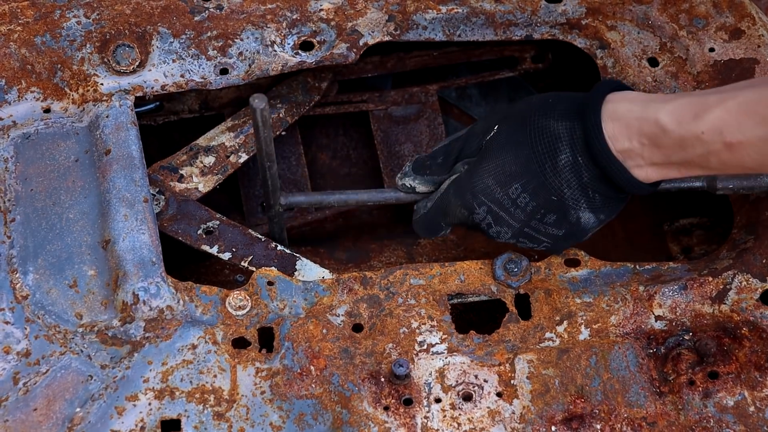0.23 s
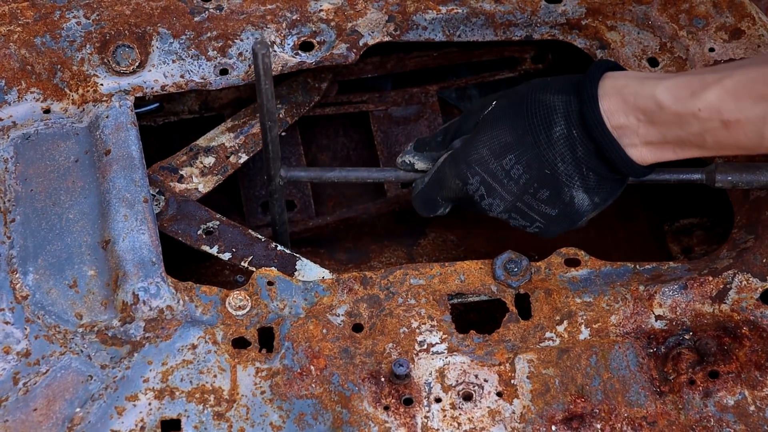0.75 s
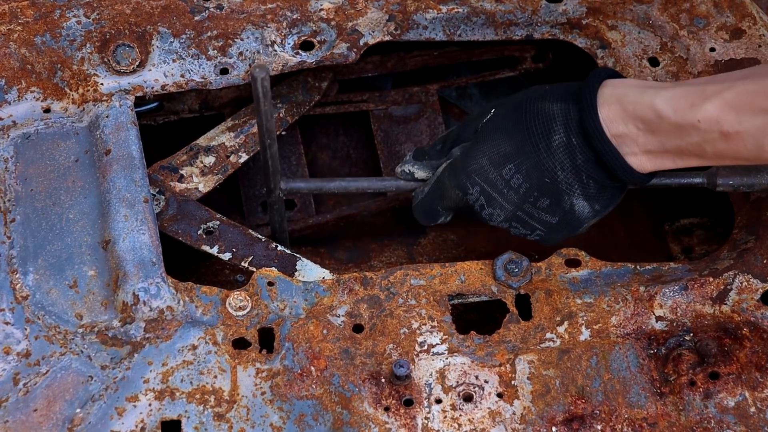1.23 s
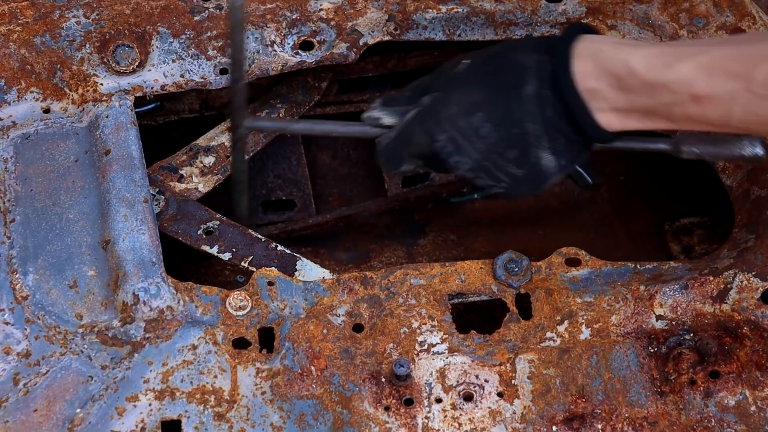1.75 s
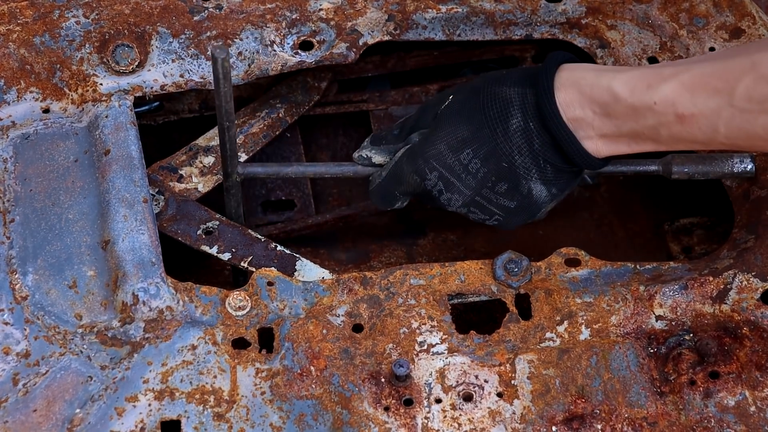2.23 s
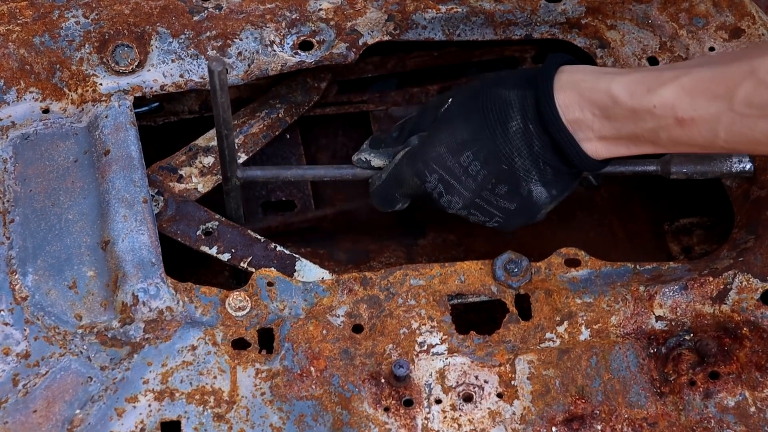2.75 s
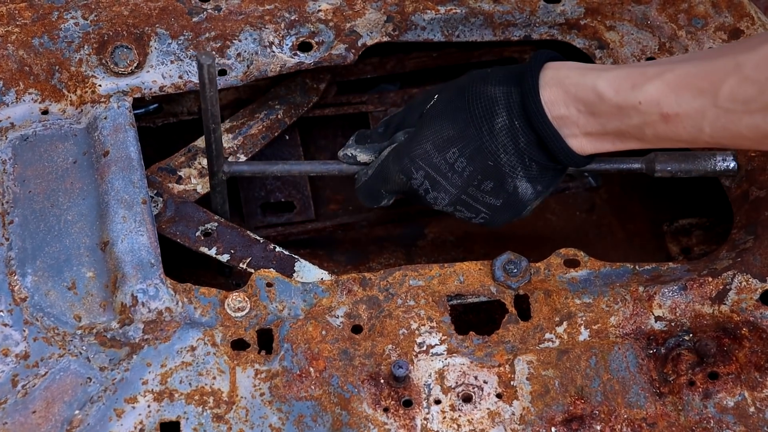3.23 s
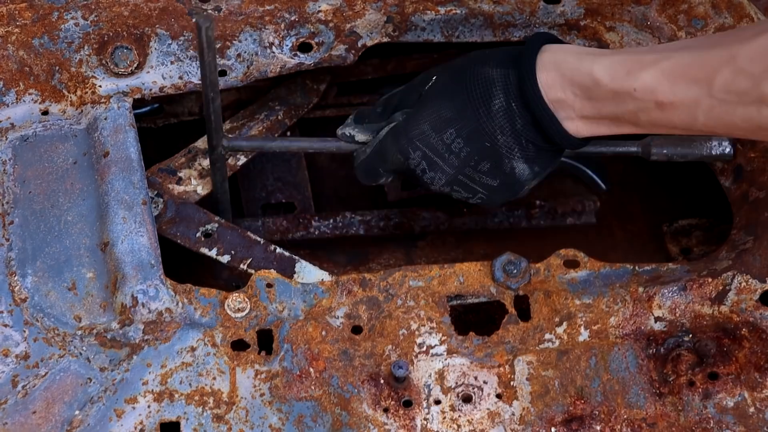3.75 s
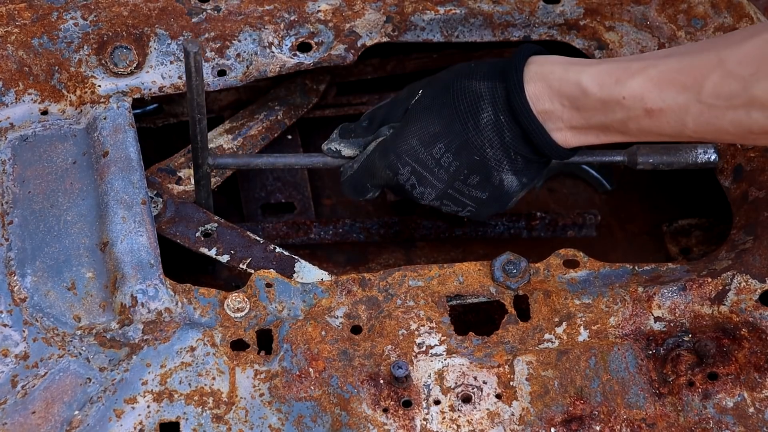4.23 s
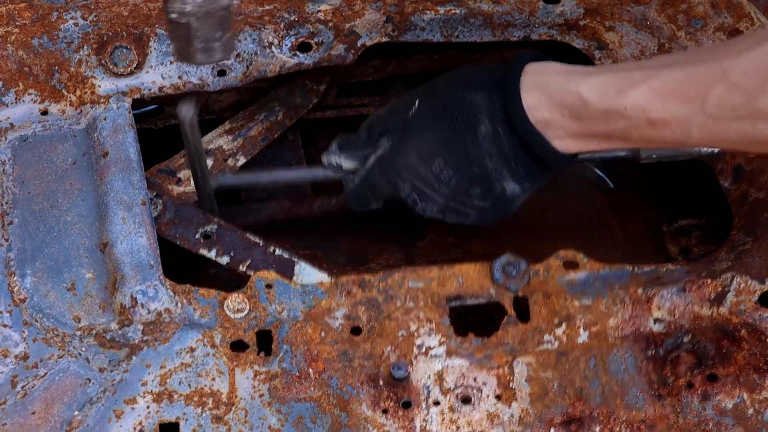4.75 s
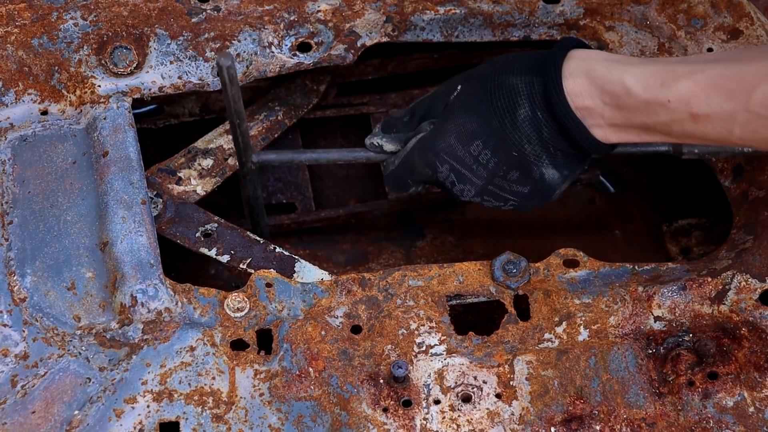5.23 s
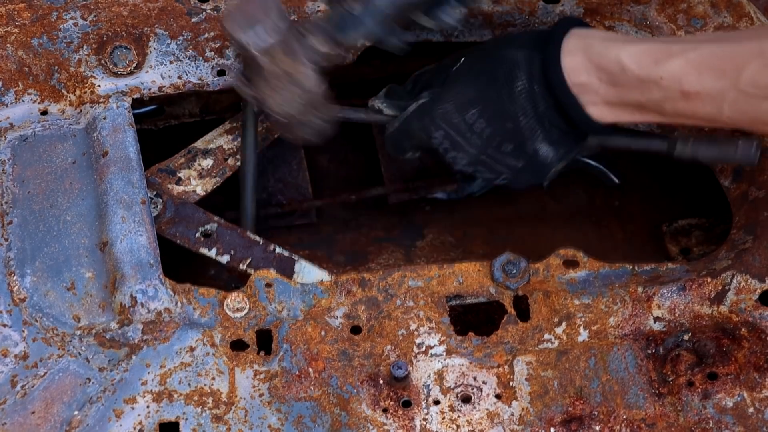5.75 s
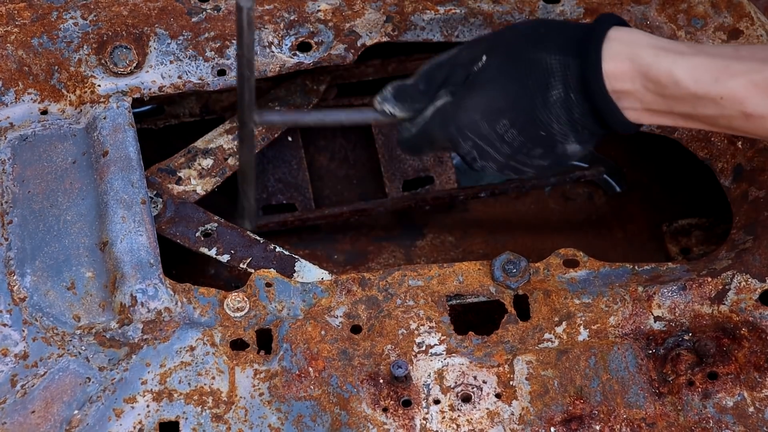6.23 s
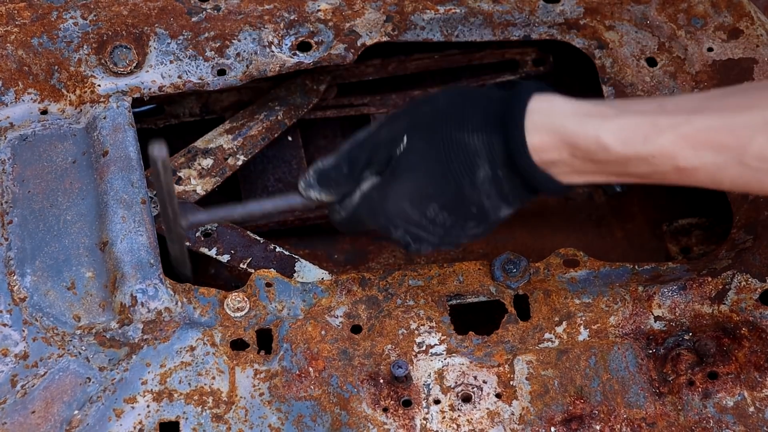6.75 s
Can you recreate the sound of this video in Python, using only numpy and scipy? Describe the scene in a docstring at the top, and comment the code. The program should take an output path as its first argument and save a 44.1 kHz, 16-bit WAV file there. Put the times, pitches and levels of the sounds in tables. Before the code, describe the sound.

Slow, hard hammer blows on a steel bar against rusty sheet metal, each clanging and rattling briefly, with softer clunks and falling flakes between.

```python
"""Hammering a steel bar on rusty sheet steel

A hand hammer drives a steel bar against a rusted frame in a workshop, close to a two-port microphone.
Blows start damped modes (cracks, panel boom) and ringing noise bands (sheet); strips and scale rattle on.
Between blows the bar is set down and scrapes, shaped noise, and rust flakes fall as short noise patters.
Hum from sines and rumble from wandering noise lie underneath; the loudest peaks overload the input."""
import sys
import numpy as np
from scipy import signal
from scipy.fft import rfft, irfft, next_fast_len
from scipy.io import wavfile
from scipy.ndimage import uniform_filter1d

SR = 44100
rng = np.random.default_rng(int(sys.argv[2]) if len(sys.argv) > 2 else 0)


def decibels_to_gain(level_db):
    """Convert a level in decibels to a linear amplitude gain (20 dB per decade)."""
    exponent = np.asarray(level_db, float) / 20
    return 10 ** exponent


def wrap_up_sound(samples):
    """Save the sound to the file named by the first command line argument, as 16-bit audio."""
    columns = np.atleast_2d(samples).T
    # keep every value between -1 and 1, then stretch to whole-number steps
    tamed = np.clip(columns, -1, 1)
    steps = np.round(tamed * 32767).astype(np.int16)
    wavfile.write(sys.argv[1], SR, steps)


N = 308259
T = np.arange(N) / SR  # time in s
BANDS_HZ = 22 * 2 ** np.arange(0, 9.6, 1 / 3)  # third-octave band centres

# Levels in the tables are relative, unless called rms: each source adds its own gain.
# Blows and knocks; boom and treble are relative to the blow's level.
# Columns: start_s, level_db, boom_db, treble_db, rise_ms
BLOWS = [(0.1347, -23.5, 0.5, -29, 3.3), (0.2137, -13, -10, -16, 2.1), (0.229, -11.5, -9, -23, 4),
         (0.865, -33, -11, -14, 2.9), (1.5176, 6, -15.5, -6.5, 0.19), (2.0492, -10.5, 0.5, -16.5, 2.5),
         (2.2622, -21, -17.5, -16.5, 1.9), (2.6556, 4, -14.5, -5, 0.27), (3.1094, -4.5, -4, -21.5, 1.9),
         (3.7658, 3, -13.5, -3.5, 0.22), (4.2736, -8.5, -4.5, -48, 1.6), (4.8201, 2.5, -11.5, -5, 0.17),
         (5.2926, -19.5, 0.5, -11, 4.8), (5.7129, -29, -20, -5, 1.6), (5.8271, 5, -22.5, -5, 0.48),
         (6.2841, -20.5, -23, -12, 1.4), (6.3008, -27, -12.5, -26, 3), (6.5779, -10.5, -13.5, -7, 1.09),
         (6.589, -3, -21, -0.5, 3.9)]
# Spells of rattling strips and rust scale.
# Columns: start_s, level_db, hold_s, boom_db, treble_db
RATTLES = [(0.0, -28.5, 0.011, 2.5, -3.5), (0.14, -38, 0.018, 7, -9.5), (0.218, -23, 0.018, 0, -7.5),
           (0.568, -51.5, 0.085, 9.5, -16), (0.861, -48.5, 0.04, 3, -5), (1.079, -49, 0.012, 5, -16),
           (1.524, -16.5, 0.11, -5.5, -2.5), (1.653, -19, 0.069, -3.5, -1.5), (1.943, -44.5, 0.12, 4, -15),
           (2.046, -24.5, 0.022, 6.5, -3.5), (2.258, -36.5, 0.012, 3.5, -17),
           (2.654, -16, 0.049, -2.5, 1.5), (2.742, -18, 0.029, 0.5, 0), (2.815, -18.5, 0.054, -1.5, -3),
           (2.966, -33.5, 0.072, -1, 1.5), (3.118, -22, 0.01, 4.5, -6), (3.768, -17.5, 0.07, -5, 1.5),
           (3.857, -18, 0.15, -2.5, 0), (4.166, -38, 0.081, 5.5, -5), (4.279, -26, 0.009, 4, -11.5),
           (4.225, -43.5, 0.02, 3, -10), (4.383, -39.5, 0.014, 1.5, -26), (4.819, -18.5, 0.12, 0, -0.5),
           (4.949, -16.5, 0.049, -4, 0), (5.039, -26.5, 0.038, -7, 3.5), (5.133, -33, 0.022, -0.5, -8),
           (5.296, -28.5, 0.019, 2.5, -7), (5.714, -46.5, 0.02, 1, -4), (5.828, -18, 0.07, -4, -0.5),
           (5.9, -18.5, 0.12, -4, -1), (6.283, -29.5, 0.012, -6, -11.5), (6.477, -50, 0.02, -14.5, -18),
           (6.576, -20, 0.049, -4.5, -2.5), (6.758, -38, 0.024, -6, -1), (6.94, -54.5, 0.04, 0, -15)]
# Falling flakes of rust.
# Columns: start_s, level_db, tilt_db_per_octave
FLAKE_FALLS = [(0.5574, -51, -1), (0.6166, -53, -1), (0.8924, -40.5, 0.5), (1.0894, -51, -4.5),
               (1.2794, -56, -1.1), (1.845, -39, -3.5), (2.0174, -50, -1.7), (2.115, -38, 4),
               (2.4388, -49.5, -1.5), (2.905, -19, -2.5), (3.007, -30, -2), (3.3594, -61, -3),
               (3.4294, -55, -1.1), (3.442, -51.5, -3), (3.669, -47, -0.7), (3.7304, -51.5, -0.5),
               (4.4713, -41.5, -6), (6.1406, -31.5, -4)]
# The bar dragged over rust; swell and fade are the times for 20 dB of change.
# Columns: loudest_s, level_db, swell_s, fade_s
DRAGS = [(0.733, -31, 0.09, 0.1), (6.795, -43, 0.029, 0.064)]
# Colour of the scraping noise.
# Columns: pitch_hz, level_db (per Hz)
DRAG_COLOUR = [(530, -59), (900, -27), (1010, -20), (1790, -12.5), (2530, -2), (3960, -11), (4920, -15),
               (6710, -14), (11300, -20), (14000, -69.5)]
# Single modes of bar and strips that sing out or squeak; t60 is the time to fall 60 dB.
# Columns: start_s, pitch_hz, level_db, t60_s, rise_ms
SINGING_MODES = [(2.657, 6600, -36, .15, 2), (3.86, 8290, -45, .9, 30), (4.0, 8290, -41, .45, 10),
                 (5.575, 1798, -54.5, .5, 40), (5.61, 2361, -61, .4, 20), (5.98, 7808, -51, .7, 10),
                 (5.98, 6901, -48, .6, 10), (6.785, 2371, -35, .17, 12), (6.762, 3004, -37, .15, 12)]
# Modes of a loose strut that is knocked once.
# Columns: pitch_hz, level_db, t60_s
STRUT_MODES = [(549, -31, .35), (1079, -47, .3), (1515, -43, .4), (2234, -40, .3), (3150, -56, 1.0),
               (3850, -45, .25), (5774, -57, .8)]
# Lowest panel modes; the t60 is shortened where it is used.
# Columns: pitch_hz, level_db, t60_s
PANEL_MODES = [(250, -22.5, 1.3), (322.5, -0.5, 0.44), (370.5, -8.5, 1), (564, -9, 0.35), (604, -11, 0.3),
               (651, -12, 0.61)]
# Colour of the dense sheet modes.
# Columns: pitch_hz, level_db (per Hz)
STEEL_COLOUR = [(35, -69), (60, -37.5), (150, -9.5), (236, -7.5), (305, 3.5), (350, -4), (533, -0.5),
                (1050, -6), (1400, -8), (2590, -7), (4500, -15), (10700, -23), (13500, -30), (15500, -79.5)]
# Relative ring time of the sheet, shortened where it is used.
# Columns: pitch_hz, t60_s
STEEL_T60 = [(80, .5), (300, 0.28), (1000, 0.15), (3000, 0.15), (8000, 0.089), (14000, 0.065)]
# How the two microphone ports compare; likeness is changed at low pitch where it is used.
# Columns: pitch_hz, likeness (0 to 1), left_lead_rad, left_minus_right_db
PORT_PAIR = [(40, 1, 1.5, 1), (130, 1, 0., -0.7), (407, 0.98, -0.5, 0.5), (786, 0.79, 0.49, 0),
             (1520, 0.11, 0.87, 0), (2490, 0.42, 2.5, -3), (4800, 0.8, 2, 1.5), (8800, 0.55, 2.5, -1),
             (14000, 0.6, 4, -1)]
# Level of the mid background noise, which rises and dips over time.
# Columns: time_s, level_db
MID_NOISE_LEVEL = [(0, -44.5), (.7, -53), (1.0, -49.5), (1.45, -46.5), (1.8, -49), (3.0, -50), (3.7, -49.5),
                   (4.1, -55), (4.75, -47), (5.1, -50.5), (5.75, -59), (6.3, -51), (6.99, -51)]
# Colour of the background noise.
# Columns: pitch_hz, level_db (per Hz)
AIR_COLOUR = [(20, -15.5), (64, -4.5), (110, -7.5), (200, -13), (360, -16), (480, -18), (725, -16),
              (1100, -22), (1600, -20), (2300, -24.5), (3300, -29), (6000, -34.5), (11500, -49),
              (15500, -68.5)]
# Mains hum.
# Columns: pitch_hz, level_db (rms)
HUM_TONES = [(60, -62), (180, -63.5)]


def on_hz(table, hz):
    """Reads the columns of a table at given pitches, on a log-frequency axis."""
    table_hz, *columns = np.transpose(table)
    return [np.interp(np.log(hz), np.log(table_hz), column) for column in columns]


def band_noises(mode_db, mode_width_hz, diffuse):
    """Third-octave noises, lumpy like close modes, with likeness and phase between ports from the table."""
    size = next_fast_len(N)
    hz = np.maximum(np.arange(size // 2 + 1) * SR / size, 1)
    like, lead_rad, lean_db = on_hz(PORT_PAIR, hz)
    # far sources come from all sides, which changes the likeness of the low notes
    like = np.clip(like, 0, 1) ** np.interp(np.log(hz), np.log([300, 1500]), [diffuse, 1])
    width = int(mode_width_hz * size / SR)
    lumps_db = mode_db * np.sqrt(width) * uniform_filter1d(rng.standard_normal(len(hz)), width)
    lumps = decibels_to_gain(lumps_db)
    shared, separate = rfft(rng.standard_normal((2, size))) * lumps / np.sqrt(np.mean(lumps ** 2))
    left = shared * decibels_to_gain(lean_db / 2)
    right = like * shared * np.exp(-1j * lead_rad) + np.sqrt(1 - like ** 2) * separate
    pair = np.array([left, right * decibels_to_gain(-lean_db / 2)])
    noises = []
    for centre in BANDS_HZ:
        shape = np.cos(np.pi / 2 * np.clip(3 * np.log2(hz / centre), -1, 1))
        noises.append(irfft(pair * shape, size)[:, :N])
    return noises


def walk(rate):
    """A wandering level: random values held for 1 / rate s and smoothed twice."""
    hold = int(SR / rate)
    steps = np.repeat(rng.standard_normal(N // hold + 1), hold)
    return 1.3 * uniform_filter1d(uniform_filter1d(steps, hold), hold)[:N]


def fade(power, t60):
    """Energy put in dies away by 60 dB in t60 s (at least 3 ms); steady input keeps its level."""
    pole = np.exp(-2 * np.log(1000) / (max(t60, .003) * SR))
    return signal.lfilter([1 - pole], [1, -pole], power)


def grains(rate, spread_db):
    """Power of many small contacts, a few much larger than the rest, with a mean of 1."""
    sizes = decibels_to_gain(2 * spread_db * rng.exponential(1, N).clip(0, 4))
    power = (rng.random(N) < rate / SR) * sizes
    return power / power.mean()


def ring(drive, hz, t60):
    """One damped mode: a resonance that falls 60 dB in t60 s."""
    pole = np.exp(2j * np.pi * hz / SR - np.log(1000) / (t60 * SR))
    return signal.lfilter([1], [1, -pole], drive).imag


def tone(hz, boom_db, treble_db):
    """Colour change in dB: boom lifts the panel band near 310 Hz, treble tilts all above 1.8 kHz."""
    boom = boom_db * np.exp(-(np.log2(hz / 310) / 0.63) ** 2 / 2)
    return boom + treble_db * np.clip(np.log2(hz / 1800) / 1.99, 0, 1.3)


def rattling():
    """Level, boom and treble of all rattles together: quick attack, hold, then a straight fall in dB."""
    attack_s, fall_db_per_s = 0.002, 134.5
    dulling_db, booming_db, settle_db = -8.5, 2, 10.5  # a dying rattle loses treble and gains boom
    power, boom, treble = np.full((3, N), 1e-12)
    for start_s, level_db, hold_s, boom_db, treble_db in RATTLES:
        near_blows = [blow[0] for blow in BLOWS if abs(blow[0] - start_s) < .03]
        begin_s = max([start_s] + near_blows[:1])  # never ahead of its blow
        hold_s = hold_s - (begin_s - start_s)
        i = int(max(begin_s, 0) * SR)
        t = T[:min(SR // 2, N - i)]
        fall_db = fall_db_per_s * np.maximum(t - hold_s, 0)
        settled = 1 - np.exp(-fall_db / settle_db)
        spell = np.minimum(t / attack_s, 1) ** 2 * decibels_to_gain(2 * (level_db - fall_db))
        power[i:i + len(t)] += spell
        # colours are averaged by the power of each spell
        boom[i:i + len(t)] += spell * (boom_db + booming_db * settled)
        treble[i:i + len(t)] += spell * (treble_db + dulling_db * settled)
    return 10 * np.log10(power), boom / power, treble / power


def room(noises):
    """The rumble wanders slowly, the mid noise rises and dips, the hiss is steadier; mains hum is added."""
    rumble_db = -55 + 2 * walk(1.5)
    mid_db = np.interp(T, *np.transpose(MID_NOISE_LEVEL))
    hiss_db, hiss_from_hz = -52, 3200
    out = sum(decibels_to_gain(db) * np.sqrt(2) * np.sin(2 * np.pi * hz * T) for hz, db in HUM_TONES)
    for hz, noise, db in zip(BANDS_HZ, noises, *on_hz(AIR_COLOUR, BANDS_HZ)):
        upper_share = np.clip(np.log2(hz / 90) / 1.1, 0, 1)
        hiss_share = np.clip(np.log2(hz / hiss_from_hz), 0, 1)
        upper_db = (1 - hiss_share) * mid_db + hiss_share * hiss_db
        level_db = (1 - upper_share) * rumble_db + upper_share * upper_db
        out = out + decibels_to_gain(db + 26.5 + level_db + 1.3 * walk(13.0)) * noise  # each band flickers a little
    return out


def scrape(noises):
    """Steel catching on rust grains; each drag swells and fades smoothly."""
    grit = fade(grains(rate=2600.0, spread_db=0.2), 0.014)
    hiss = sum(decibels_to_gain(db) * noise for db, noise in zip(*on_hz(DRAG_COLOUR, BANDS_HZ), noises))
    drag = 0
    for loudest_s, level_db, swell_s, fade_s in DRAGS:
        change_s = np.where(T < loudest_s, swell_s, fade_s)
        drag = drag + decibels_to_gain(level_db - 20 * ((T - loudest_s) / change_s) ** 2)
    return decibels_to_gain(11.5) * drag * np.sqrt(grit) * hiss


def flakes(noises):
    """Each falling flake is a short, fast-fading patter of the noise bands centred above 1.5 kHz."""
    t60_s = 0.14
    out = np.zeros((2, N))
    for start_s, level_db, tilt_db in FLAKE_FALLS:
        i = int(start_s * SR)
        t = T[:min(SR // 8, N - i)]
        patter = 0
        for hz, noise in zip(BANDS_HZ, noises):
            if hz > 1500:
                patter = patter + decibels_to_gain(tilt_db * np.log2(hz / 5000)) * noise[:, i:i + len(t)]
        out[:, i:i + len(t)] += decibels_to_gain(level_db - 8.0 - 60 * t / t60_s) * patter
    return out


def rings():
    """Lone modes of bar, strips and a strut, shaken for a moment and left to fade unevenly."""
    strut_s, strut_rise_ms = 6.288, 4.4
    strut = [(strut_s, *mode, strut_rise_ms) for mode in STRUT_MODES]
    out = np.zeros(N)
    for start_s, hz, level_db, t60, rise_ms in SINGING_MODES + strut:
        t = np.maximum(T - start_s, 0)
        swell = 1 - np.exp(-(t * 1000 / rise_ms) ** 2)
        fall_db = 60 * np.maximum(t - rise_ms / 1000, 0) / t60
        out += decibels_to_gain(level_db - fall_db + 3 * walk(45)) * swell * np.sin(2 * np.pi * hz * t)
    return np.array([decibels_to_gain(-0.5) * out, decibels_to_gain(2.0) * out])


def clinks(count):
    """Small loose parts, one short mode each in its own place, knocked now and then during the rattle."""
    low_hz, high_hz = 901, 10450
    t60_s, knocks_per_s, gain_db = 0.09, 22., -11.5  # each part's t60 is 0.5 to 1.5 times this
    level_db, _, treble_db = rattling()
    out = np.zeros((2, N))
    for place, side, length in rng.random((count, 3)):
        hz = low_hz * (high_hz / low_hz) ** place
        knocks = (rng.random(N) < knocks_per_s / SR) * decibels_to_gain(5.0 * rng.standard_normal(N))
        db = level_db + gain_db + on_hz(STEEL_COLOUR, hz)[0] + tone(hz, 0, treble_db)
        clink = ring(knocks * decibels_to_gain(db), hz, t60_s * (.5 + length))
        out += [clink, np.roll(clink, int(8 * side))]  # the right port hears it up to 7 samples later
    return out


def thumps():
    """The whole frame jumps under the hard blows: one low, short mode, weak for slow contacts."""
    drive = np.zeros(N)
    for start_s, level_db, boom_db, _, rise_ms in BLOWS:
        drive[int(start_s * SR)] = decibels_to_gain(level_db + boom_db - 17.5) / (1 + rise_ms ** 2)
    return ring(drive, hz=99, t60=0.047)


def panels():
    """The lowest panel modes: each hit favours other modes, and the rattle shakes them lightly."""
    level_db, boom_db, _ = rattling()
    drive = decibels_to_gain(level_db + boom_db - 36.0) * rng.standard_normal((len(PANEL_MODES), N))
    favour = decibels_to_gain(3.0 * rng.standard_normal((len(BLOWS), len(PANEL_MODES), 1)))
    for (start_s, peak_db, low_db, _, rise_ms), share in zip(BLOWS, favour):
        # soft contacts push longer and move the panels more
        push = np.hanning(int((.0012 + 0.00018 * rise_ms) * SR))
        push_db = peak_db + low_db - 6.5 + 2.2 * min(rise_ms, 3)
        i = int(start_s * SR)
        drive[:, i:i + len(push)] += share * decibels_to_gain(push_db) * push / push.sum()
    out = 0
    for shake, (hz, db, t60) in zip(drive, PANEL_MODES):
        out = out + decibels_to_gain(db) * ring(shake, hz, min(0.45 * t60, .17))
    return out


def cracks():
    """First swings before the sheet takes over: a short dull thud from every contact, plus a clack
    that is strongest from hard ones."""
    clack_drive, thud_drive = np.zeros((2, N))
    for start_s, level_db, boom_db, treble_db, rise_ms in BLOWS:
        i = int(start_s * SR)
        clack_drive[i] = decibels_to_gain(level_db + treble_db + 2.5) / (1 + rise_ms ** 2)
        thud_drive[i] = decibels_to_gain(level_db + boom_db - 3.0)
    clack = ring(clack_drive, 1900, 0.011)
    push = np.convolve(thud_drive, np.hanning(26) / 12)[:N]  # a rounded push of about 0.6 ms
    thud = ring(push, 330, 0.13) + 0.92 * ring(push, 560, 0.055) + 0.21 * ring(push, 850, 0.024)
    return np.array([clack + thud, np.roll(clack, 4) + thud])


def sheet(noises):
    """Dense sheet modes: each hit starts every band ringing, and the rattle keeps feeding them."""
    level_db, boom_db, treble_db = rattling()
    chatter = grains(rate=1600.0, spread_db=2.0)
    colours, ring_times = on_hz(STEEL_COLOUR, BANDS_HZ), on_hz(STEEL_T60, BANDS_HZ)
    out = 0
    for hz, noise, db, t60 in zip(BANDS_HZ, noises, *colours, *ring_times):
        rattle_db = level_db + 11.5 + 1.59 * walk(28) + tone(hz, boom_db, treble_db)
        power = fade(fade(chatter, 0.097 * t60) * decibels_to_gain(2 * rattle_db), 0.44 * t60)
        for start_s, peak_db, low_db, high_db, rise_ms in BLOWS:
            i = int(start_s * SR)
            t = T[:min(SR // 2, N - i)]
            band_rise_ms = max(rise_ms * min(1, 5000 / hz), .05)
            shape = (1 - np.exp(-t * 1000 / band_rise_ms)) * decibels_to_gain(-60 * t / (0.36 * t60))
            # the treble flashes at a hard first contact
            shape *= 1 + 5.2 * np.clip(hz / 5000, 0, 1) * np.exp(-t / 0.00061) / (1 + rise_ms ** 2)
            hit_db = peak_db + 5.5 + tone(hz, .5 * (low_db + 3), high_db + 9.0)
            power[i:i + len(t)] += (shape * decibels_to_gain(hit_db)) ** 2
        out = out + decibels_to_gain(db) * np.sqrt(power) * noise
    return out


def scene():
    """All sources at the two ports; thin sheet radiates little bass."""
    work = band_noises(mode_db=2.04, mode_width_hz=24., diffuse=0.66)
    air = band_noises(mode_db=2.0, mode_width_hz=30., diffuse=9.7)
    knock_cut = signal.butter(3, 240, "high", fs=SR, output="sos")
    steel_cut = signal.butter(2, 90, "high", fs=SR, output="sos")
    knocks = signal.sosfilt(knock_cut, panels() + cracks())
    steel = signal.sosfilt(steel_cut, sheet(work) + knocks)
    background = room(air) + scrape(work) + flakes(work)
    return background + rings() + clinks(count=40) + thumps() + steel


def band_limit(x):
    """A steep low-pass at the top of the band."""
    return signal.sosfilt(signal.butter(12, 16150, fs=SR, output="sos"), x)


def record(dry):
    """The input overloads: peaks beyond full scale are cut flat."""
    overloaded = np.clip(dry, -1, 1)
    return band_limit(overloaded)


dry = scene()
out = record(dry)
wrap_up_sound(out)
```